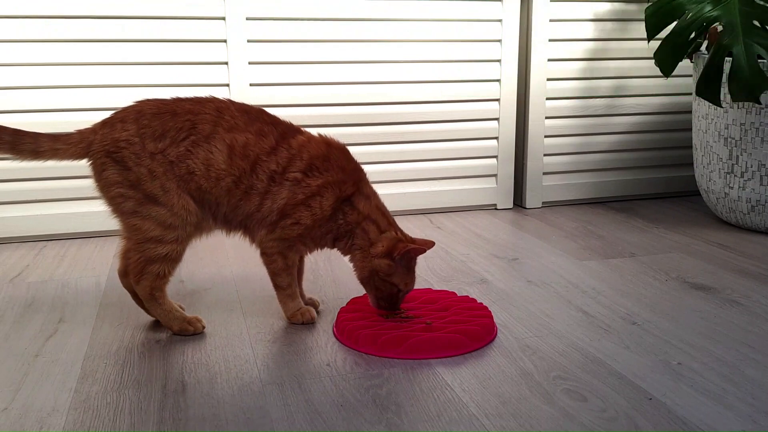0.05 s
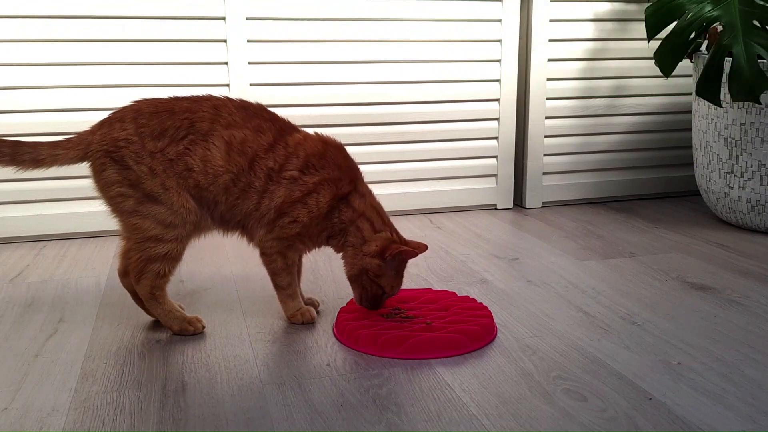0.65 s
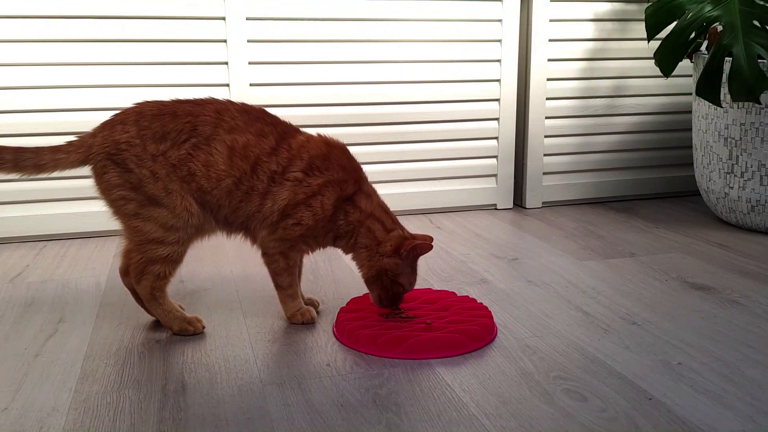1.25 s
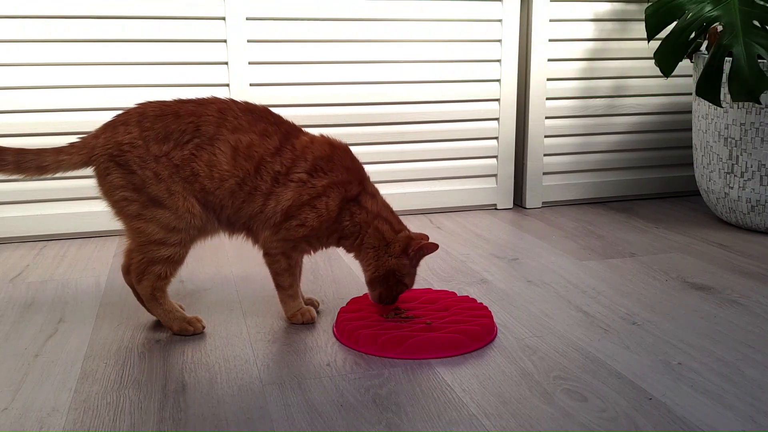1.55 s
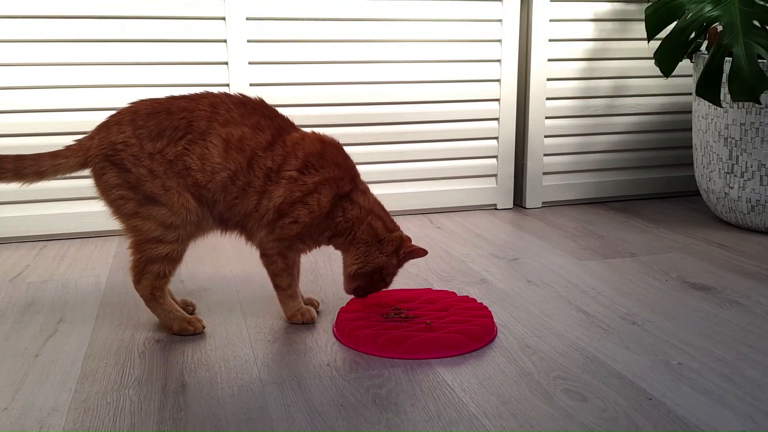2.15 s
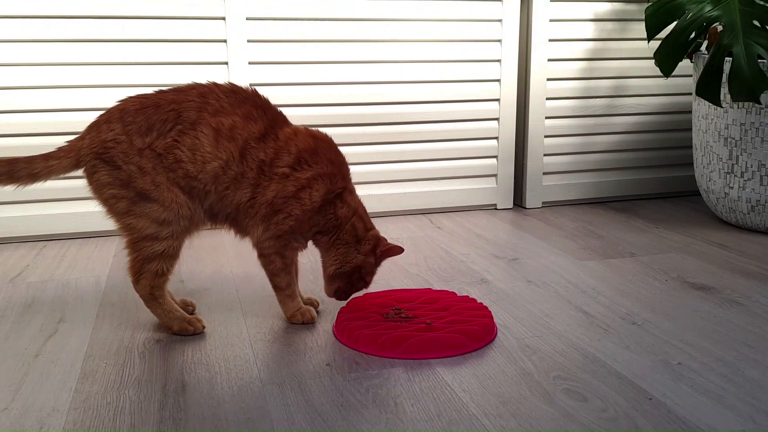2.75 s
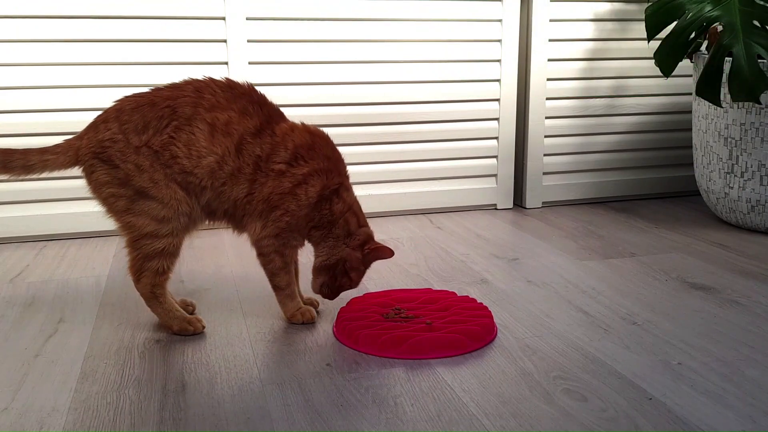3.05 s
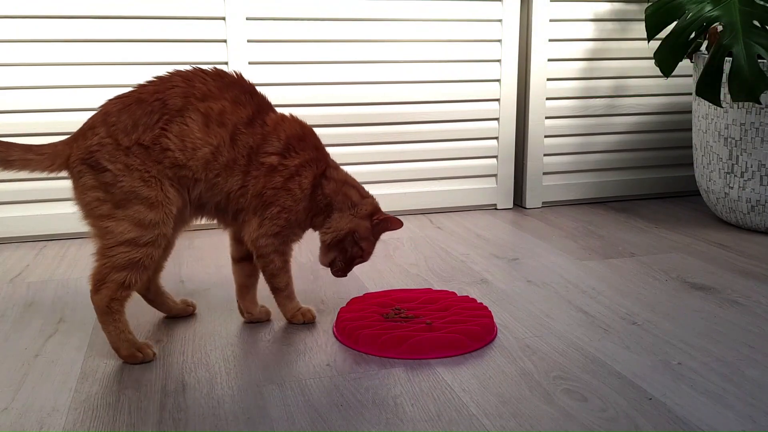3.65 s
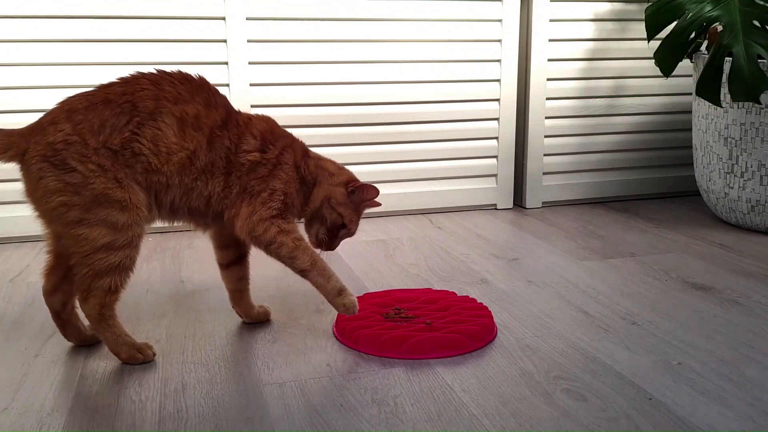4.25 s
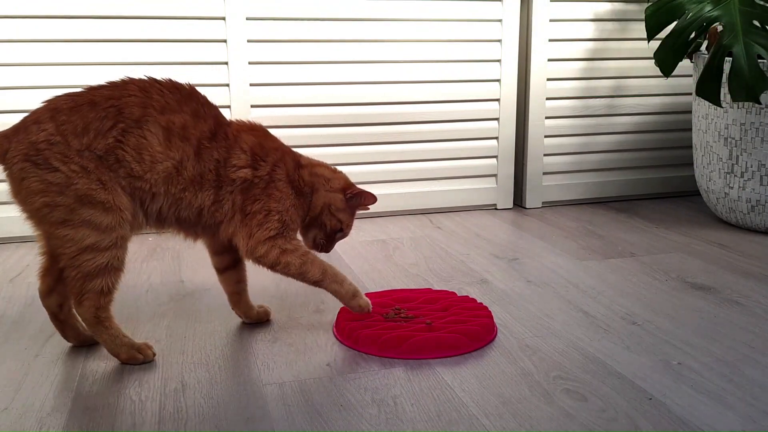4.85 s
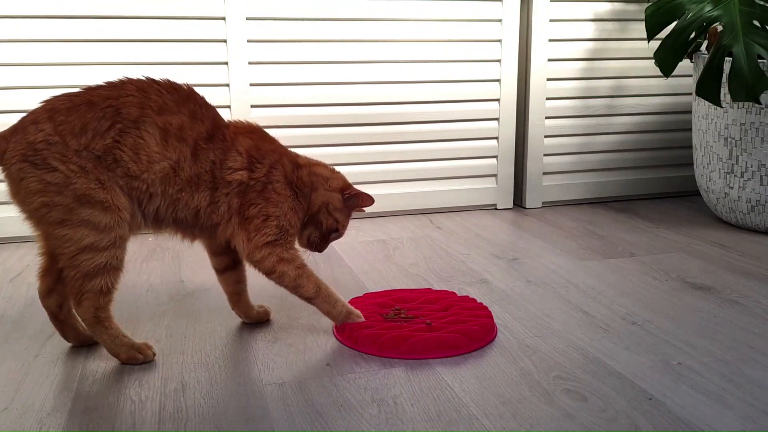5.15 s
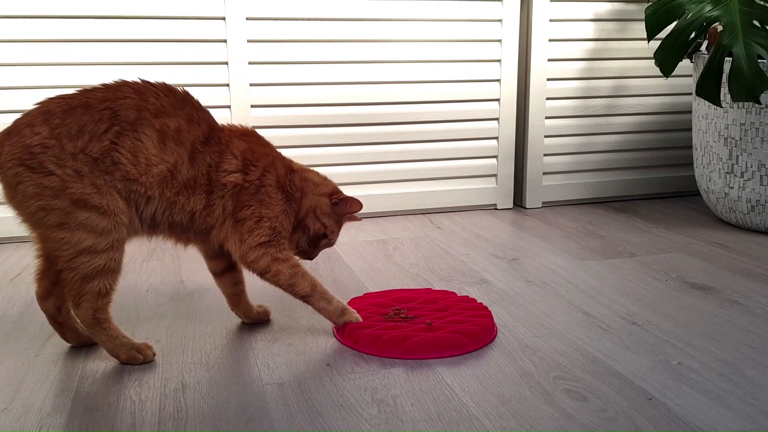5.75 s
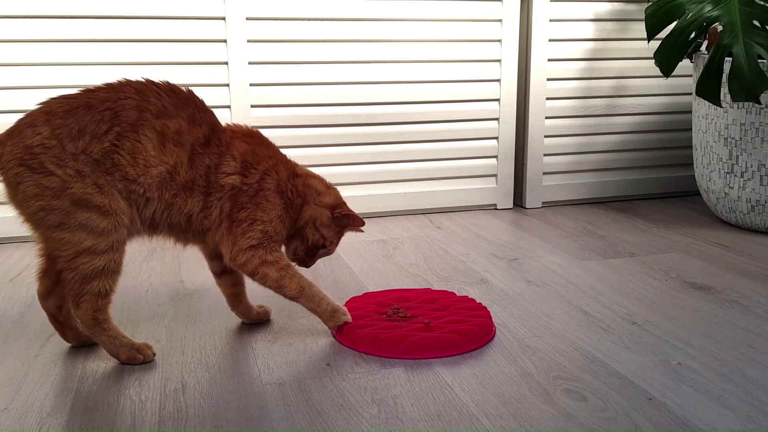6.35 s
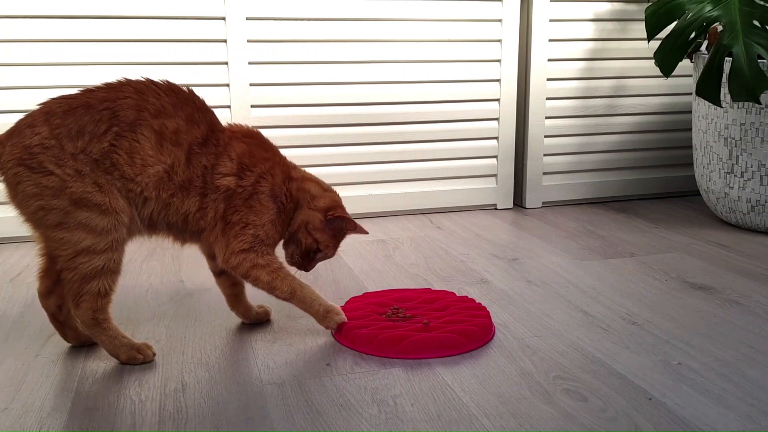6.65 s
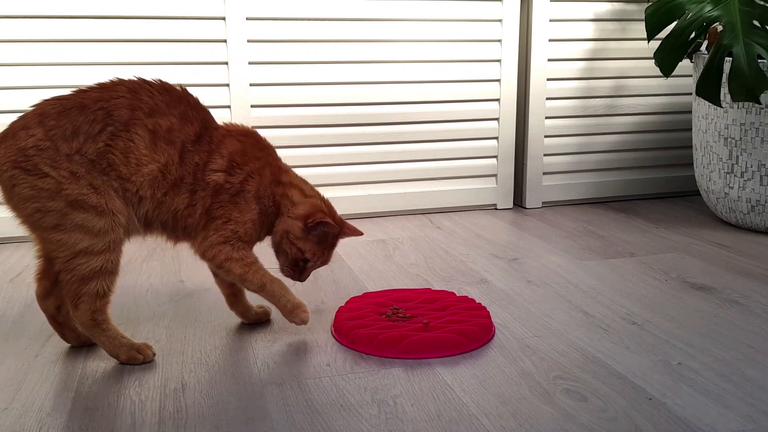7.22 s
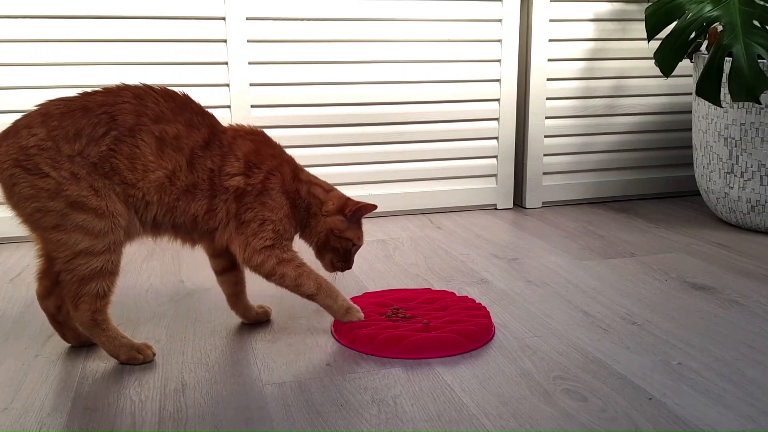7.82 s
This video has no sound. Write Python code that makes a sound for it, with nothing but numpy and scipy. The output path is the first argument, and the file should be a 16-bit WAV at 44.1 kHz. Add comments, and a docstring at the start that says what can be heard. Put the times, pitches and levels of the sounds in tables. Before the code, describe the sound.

Soft thuds and pellet clacks as a cat paws a feeding mat, after faint rustling and a sniff, with a distant engine humming.

```python
"""A cat noses at dry kibble on a feeding mat, sniffs, then paws at it in a bare, echoing room.
Each blow makes the mat thud and the pellets clack; pellets also tick and rustle under its muzzle.
The sniff is a puff of air ringing in the narrow passages of the nose. Thin squeaks come and go, with
one faint, longer, raspy rustle near 6.8 s. Far off through the walls an engine drones and slowly
dulls, over a second, steadier hum, a deep wavering tone and the microphone's hiss."""
import sys
import numpy as np
from scipy import signal
from scipy.fft import rfft, irfft, next_fast_len
from scipy.io import wavfile
from scipy.ndimage import map_coordinates

SR = 44100
rng = np.random.default_rng(int(sys.argv[2]) if len(sys.argv) > 2 else 0)


def wrap_up_sound(samples):
    """Save the sound to the file named by the first command line argument, as 16-bit audio."""
    columns = np.atleast_2d(samples).T
    # keep every value between -1 and 1, then stretch to whole-number steps
    tamed = np.clip(columns, -1, 1)
    steps = np.round(tamed * 32767).astype(np.int16)
    wavfile.write(sys.argv[1], SR, steps)


N = 351907

# how alike the left and right channels are: (frequency [Hz], likeness [1 = the same])
STEREO_LIKENESS = [(60, 0.75), (150, 0.89), (290, 0.76), (600, 0.22), (1300, 0.018), (15000, 0.017)]
# how long the room echoes: (frequency [Hz], time to fade by 60 dB [s])
ECHO_TIMES = [(200, 0.27), (1000, 0.42), (4000, 0.42), (12000, 0.72)]
# the tone colour of three background noises: (frequency [Hz], relative level [dB])
LOW_RUMBLE_COLOUR = [(12, -18), (25, -19), (40, -6), (55, -4), (100, 2.5), (135, -6), (200, -10),
                     (290, -17), (400, -38.5), (600, -61.5)]
UPPER_RUMBLE_COLOUR = [(90, -24), (160, 4.5), (250, -0.5), (340, -3), (430, -12), (560, -18.5), (750, -28),
                       (1500, -48.5)]
HISS_COLOUR = [(380, -44), (650, -0.5), (686, -2), (804, -6.5), (996, -4), (1250, -5), (2670, -7.5),
               (3880, -10), (4250, -10.5), (7350, -18), (8620, -17), (11900, -2.5), (15100, -2),
               (15700, -3)]
# how the upper rumble rises and falls: (time [s], level [dB])
UPPER_RUMBLE_LEVELS = [(0, -50.5), (0.45, -48.5), (1.3, -55.5), (2.0, -48.5), (2.65, -47.5), (3.15, -54.5),
                       (5.0, -56.5), (7.98, -56.5)]
# the tones in the hum: (multiple of its base pitch, level against HUM_DB [dB])
HUM_TONES = [(2, 2), (3, -7.5), (3.2, -18), (4, -5), (5, -18.5), (5.25, -20), (6, -25), (7, -27.5)]
# the engine's strong tones, at 3, 6 and 9 times the turning rate of its shaft:
# (time [s], 3x level [dB], 6x level [dB], 9x level [dB])
ENGINE_LEVELS = [(0, -45.5, -45.5, -54), (0.9, -40, -40.5, -55), (1.9, -44.5, -40.0, -53.5),
                 (2.6, -41, -40, -52), (3.6, -43, -43.5, -53.5), (4.4, -41.5, -47.5, -62),
                 (5.3, -38.5, -56.5, -58), (6.1, -40.0, -61.5, -64.5), (7.98, -41, -55.5, -66.5)]
# its weak tones: (multiple of the turning rate, level against the 9x tone [dB])
ENGINE_OVERTONES = [(3.5, -3), (4, 1.5), (7, -5), (8, -6), (12, -8), (14, -17), (15, -20.5), (16, -19),
                    (18, -25)]
# thin squeaks, and one faint, longer, raspy rustle near 6.8 s: (time [s], length [s], start pitch [Hz],
# end pitch [Hz], relative level [dB], octave against the base tone [dB], rasp [share of the pitch])
SQUEAKS_AND_RUSTLE = [(0.68, .14, 2900, 3070, -82.5, 10, 0.039), (0.877, 0.13, 3130, 3250, -82, 9, 0.036),
                      (0.95, 0.24, 550, 561, -63, -19, .05), (1.849, 0.17, 3040, 2650, -71.5, 0, 0.073),
                      (3.17, 0.088, 3200, 3280, -71, -4, 0.035), (3.81, 0.061, 2200, 2120, -67, -25, .03),
                      (4.461, 0.074, 2440, 2670, -73, 1, 0.055),
                      (4.517, 0.087, 3130, 3160, -70, 1.5, 0.045),
                      (4.949, .18, 3030, 3274, -68.5, 5, 0.058), (5.067, 0.08, 3290, 3450, -60, -10, 0.031),
                      (5.464, .07, 3100, 3110, -80, 15.5, 0.032),
                      (5.467, 0.142, 2364, 2315, -64.5, 2.5, 0.035),
                      (5.533, 0.12, 2740, 2737, -55.5, -6.5, 0.017),
                      (5.91, 0.13, 3750, 3940, -68.5, -29, 0.056), (6.801, .42, 2517, 2710, -74, -18, .11),
                      (7.12, 0.092, 2357, 2525, -74, 2, 0.069), (7.172, 0.12, 2860, 3000, -73.5, 4.5, .05)]
# where the nose's passages ring: (frequency [Hz], width [Hz], relative level [dB], delay [s])
NOSE_RESONANCES = [(1191, 1000, -29, 0), (2484, 240, -2, 0.0016), (3590, 160, 2.5, 0.022),
                   (4450, 350, -7.5, 0), (4840, 480, -8.5, 0), (6300, 650, -23, .015),
                   (9600, 3200, -27, 0.0037)]
# pellets touching each other: (time [s], relative level [dB], centre frequency [Hz],
# width to each side [share of the centre], time to fade by 60 dB [s])
PELLET_TICKS = [(0.08, -66, 9900, .15, 0.055), (1.157, -55.5, 11900, .22, 0.071),
                (2.06, -70, 9000, .15, .15), (3.575, -68, 9000, .2, 0.078), (3.75, -68.5, 8300, .12, .06),
                (4.34, -61, 11400, 0.098, .06), (4.572, -57, 4100, 0.13, 0.04),
                (5.595, -48, 2460, 0.078, 0.14)]
# the muzzle pushing through the pellets: (time [s], length [s], relative level [dB])
MUZZLE_RUSTLES = [(0.821, 0.3, -63.5), (1.905, 0.33, -68.5), (3.13, 0.31, -71), (5.878, 0.095, -62.5),
                  (6.802, 0.48, -73.5)]
# the tone colour of that rustle: (frequency [Hz], relative level [dB])
MUZZLE_COLOUR = [(300, -27), (560, 17), (750, 1), (1200, 7.5), (2000, 0.5), (2700, 3), (3600, 1.5),
                 (5000, -5), (9500, -8.5), (14000, -17)]
# where the mat's thud and the pellets' clack and higher click ring:
# (frequency [Hz], width [Hz], relative level [dB])
MAT_RESONANCES = [(353, 80, -4), (533, 100, 4), (666, 92, 5.5), (830, 210, -1)]
CLACK_RESONANCES = [(1180, 177, 8.5), (1575, 160, 4.5), (1940, 360, 1), (2680, 450, 0.5)]
CLICK_RESONANCES = [(3830, 4100, -1.5), (6200, 1500, 0.5), (8850, 3600, -18)]
# paw and pellets striking the mat: (time [s], relative level [dB], hardness [dB])
BLOWS = [(0.827, -59, -2.5), (3.569, -69, 5), (4.446, -51, -5.5), (4.57, -70, 7.5), (4.702, -54, -15),
         (4.985, -55, -4.5), (5.303, -45.5, -13), (5.324, -58.5, -5), (5.371, -55, -10), (5.591, -36.5, -7),
         (5.614, -39.5, -25), (5.649, -48, -18), (5.815, -67, 5), (5.832, -49.5, -5.5), (6.353, -46, -6.5),
         (6.374, -49.5, -19)]

TOP_HZ = 15800
THROB_HZ, THROB_DB = 55.5, -52
THROB_SWELL_AT_S, THROB_RISE_S, THROB_SWELL_DB = 6.14, 0.15, 5
HUM_HZ, HUM_SAG_HZ_PER_S, HUM_DB = 73, 0.085, -55
SHAFT_HZ, SHAFT_SAG_HZ_PER_S = 27.35, 0.057
SNIFF_AT_S, SNIFF_GAIN_DB = 2.83, -31
SNIFF_RISE_S, SNIFF_HOLD_S, SNIFF_FALL_DB_PER_S = 0.035, 0.018, 210
SNIFF_SCOOP, SNIFF_SETTLE_S = 0.11, 0.025  # the pitch starts low by this share, then settles
CLICK_PER_HARDNESS = 1.14  # dB of extra click for each dB of hardness


def amp(db):
    """Turn decibels into a number to multiply by."""
    return 10 ** (np.asarray(db) / 20)


def unit(x):
    """Scale a sound to an average strength (rms) of 1."""
    return x / np.sqrt(np.mean(x ** 2) + 1e-30)


def seconds(size=N):
    """The time of every sample."""
    return np.arange(size) / SR


def along(points, hz):
    """Read between (frequency, value) points, giving each octave about equal space."""
    frequencies, values = np.transpose(points)
    return np.interp(np.log(hz + 1), np.log(frequencies + 1), values)


def curves(rows):
    """Turn each column after the time into one value per sample."""
    times, *columns = np.transpose(rows)
    return [np.interp(seconds(), times, column) for column in columns]


def wobble(rate, size=N):
    """A smooth curve through `rate` random points a second."""
    points = rng.standard_normal(int(size * rate / SR) + 4)
    coarse = np.arange(0, size + 16, 16)
    return np.interp(np.arange(size), coarse, map_coordinates(points, [coarse * rate / SR]))


def phase_of(hz):
    """The angle a wave has run through as it follows a pitch curve."""
    return 2 * np.pi * np.cumsum(hz) / SR


def add(track, start_s, sound):
    """Mix a sound into a track at the given time."""
    part = track[..., round(start_s * SR):][..., :sound.shape[-1]]
    part += sound[..., :part.shape[-1]]


def filtered(x, response):
    """Turn each frequency up or down by response(hz)."""
    size = x.shape[-1]
    padded = next_fast_len(size + 8192)
    return irfft(rfft(x, padded) * response(np.fft.rfftfreq(padded, 1 / SR)), padded)[..., :size]


def band(x, centre_hz, half_width_hz):
    """Keep mostly the frequencies near the centre."""
    return filtered(x, lambda hz: 1 / (1 + ((hz - centre_hz) / half_width_hz) ** 2))


def ring(x, resonances):
    """A struck object rings at its own frequencies (resonances); the result has energy 1."""
    def response(hz):
        return sum((-1) ** k * amp(db) * 1j * hz * width / (centre ** 2 - hz ** 2 + 1j * hz * width)
                   for k, (centre, width, db) in enumerate(resonances))
    ringing = filtered(x, response)
    return ringing / np.linalg.norm(ringing)


def stereo_shares(hz):
    """How much sound the two channels share (mid) and how much sets them apart (side)."""
    angle = np.arccos(np.clip(along(STEREO_LIKENESS, hz), -1, 1)) / 2
    return np.array([np.cos(angle), np.sin(angle)])


def wide_noise(colour):
    """Noise from all around: left and right are alike in the bass, unrelated in the treble."""
    noise = rng.standard_normal((2, N))
    mid, side = filtered(noise, lambda hz: amp(along(colour, hz)) * stereo_shares(hz))
    return np.array([mid + side, mid - side]) / np.std(mid)


def in_room(x, direct_db):
    """The direct sound plus its echo from the hard floor and walls, in stereo."""
    hz, t, noise = signal.stft(rng.standard_normal((2, SR // 2)), SR, nperseg=256)
    fade = amp(-60 * t / along(ECHO_TIMES, hz)[:, None])
    mid, side = signal.istft(noise * fade * stereo_shares(hz[:, None]), SR, nperseg=256)[1]
    echo = np.array([mid + side, mid - side]) / np.linalg.norm(mid)
    echo[:, 0] += amp(direct_db)
    return signal.fftconvolve(x[None], echo, axes=1)[:, :N] / np.hypot(1, amp(direct_db))


def far_tone(phase, waver_db, drift):
    """A far tone wavers and drifts on its way, and reaches two microphones slightly out of step."""
    angle = phase + rng.uniform(0, 2 * np.pi) + drift * wobble(4)
    spread = 0.083 * rng.choice([-1, 1]) * np.array([[1], [-1]])
    return np.sqrt(2) * amp(waver_db * wobble(4)) * np.sin(angle + spread)


def hiss():
    """The microphone's own faint, steady noise."""
    return amp(-61.5) * wide_noise(HISS_COLOUR)


def rumble():
    """Engine noise muffled by the walls; its lowest part wavers by about 1 dB."""
    upper_db, = curves(UPPER_RUMBLE_LEVELS)
    low = amp(-46.5 + wobble(2.44)) * wide_noise(LOW_RUMBLE_COLOUR)
    return low + amp(upper_db) * wide_noise(UPPER_RUMBLE_COLOUR)


def throb():
    """A deep tone wavers under the hum, then grows and stays louder."""
    swell = np.clip((seconds() - THROB_SWELL_AT_S) / THROB_RISE_S, 0, 1)
    tone = far_tone(2 * np.pi * THROB_HZ * seconds(), waver_db=4.5, drift=0.6)
    return amp(THROB_DB + THROB_SWELL_DB * swell) * tone


def hum():
    """A second machine hums at a nearly steady level, its pitch barely sinking."""
    phase = phase_of(HUM_HZ - HUM_SAG_HZ_PER_S * seconds())
    return sum(amp(HUM_DB + db) * far_tone(multiple * phase, waver_db=1.5, drift=0.13)
               for multiple, db in HUM_TONES)


def engine():
    """The pitch sags as the shaft slows, and the higher tones fade as the engine draws away."""
    third_db, sixth_db, ninth_db = curves(ENGINE_LEVELS)
    shaft = phase_of(SHAFT_HZ - SHAFT_SAG_HZ_PER_S * seconds())
    out = np.zeros((2, N))
    for multiple, db in zip((3, 6, 9), (third_db, sixth_db, ninth_db)):
        out += amp(db) * far_tone(multiple * shaft, waver_db=0.08, drift=0.13)
    for multiple, db in ENGINE_OVERTONES:
        out += amp(ninth_db + db) * far_tone(multiple * shaft, waver_db=-0.2, drift=0.11)
    return out


def squeaks_and_rustle():
    """A fast tremble in pitch makes squeaks raspy; the widest tremble blurs one tone into a rustle."""
    out = np.zeros(N)
    for start_s, length_s, start_hz, end_hz, db, octave_db, rasp in SQUEAKS_AND_RUSTLE:
        size = int(length_s * SR)
        tremble = rasp * wobble(697, size=SR // 2)[:size]
        phase = phase_of(np.linspace(start_hz, end_hz, size) * (1 + tremble))
        overtones = np.sin(2 * phase) + amp(-15) * np.sin(3 * phase)
        tone = np.sin(phase) + amp(octave_db) * overtones
        add(out, start_s, amp(db + 1) * signal.windows.tukey(size, 0.7) * tone)
    return in_room(out, direct_db=-4)


def sniff():
    """A puff of air swells, holds and dies; the nose's resonances slide up, the narrowest starting last."""
    t, puff = seconds(SR // 2), np.zeros(SR // 2)
    pitch = 1 - SNIFF_SCOOP * np.exp(-t / SNIFF_SETTLE_S)
    for hz, width_hz, db, delay_s in NOSE_RESONANCES:
        age_s = np.maximum(t - delay_s, 0)
        falling_s = np.maximum(age_s - SNIFF_RISE_S - SNIFF_HOLD_S, 0)
        flow = np.minimum(age_s / SNIFF_RISE_S, 1) * amp(SNIFF_GAIN_DB - SNIFF_FALL_DB_PER_S * falling_s)
        air = band(rng.standard_normal(len(t)), hz, width_hz / 2)
        sliding_air = map_coordinates(air, [np.cumsum(pitch)], mode="mirror")  # slower sounds lower
        puff += amp(db) * flow * sliding_air
    out = np.zeros((2, N))
    add(out, SNIFF_AT_S, in_room(puff, direct_db=-0.5))
    return out


def kibble():
    """Pellets tick against each other and rustle under the muzzle."""
    out, t = np.zeros(N), seconds(SR // 5)
    for start_s, db, centre_hz, width, fade_s in PELLET_TICKS:
        grains = rng.laplace(size=len(t)) * amp(-60 * t / fade_s)
        tick = unit(band(grains, centre_hz, width * centre_hz))
        add(out, start_s, amp(db - 13) * tick)
    for start_s, length_s, db in MUZZLE_RUSTLES:
        grains = rng.standard_normal(SR // 2)[:int(length_s * SR)] ** 3  # cubing makes noise crackle
        rustle = unit(filtered(grains, lambda hz: amp(along(MUZZLE_COLOUR, hz))))
        add(out, start_s, amp(db) * np.hanning(len(rustle)) * rustle)
    return in_room(out, direct_db=-3.5)


def knocks():
    """Each blow thuds on the mat; the harder it is, the more the pellets clack and click."""
    out, t = np.zeros((2, N)), seconds(SR // 10)
    for start_s, db, hardness_db in BLOWS:
        scuffle = rng.standard_normal(len(t)) * amp(-60 * t / 0.051)
        contacts = 0.31 * scuffle / np.linalg.norm(scuffle)
        contacts[0] += 1  # one sharp hit leads the short scuffle
        thud = amp(23) * ring(contacts, MAT_RESONANCES)
        clack = amp(hardness_db + 27.5) * ring(contacts, CLACK_RESONANCES)
        click = amp(CLICK_PER_HARDNESS * hardness_db + 19.5) * ring(contacts, CLICK_RESONANCES)
        add(out, start_s, amp(db) * in_room(thud + clack + click, direct_db=-10.5))
    return out


def scene():
    """The cat in front of the room's drone, all a little to the left."""
    cat = knocks() + kibble() + sniff() + squeaks_and_rustle()
    background = engine() + hum() + throb() + rumble() + hiss()
    return (cat + background) * amp([[0.35], [-0.35]])


def record(dry):
    """The recorder keeps nothing above TOP_HZ."""
    return filtered(dry, lambda hz: hz < TOP_HZ)


dry = scene()
out = record(dry)
wrap_up_sound(out)
```